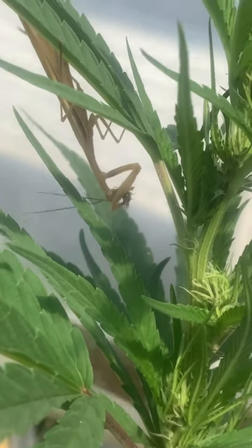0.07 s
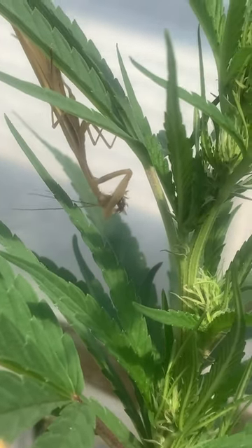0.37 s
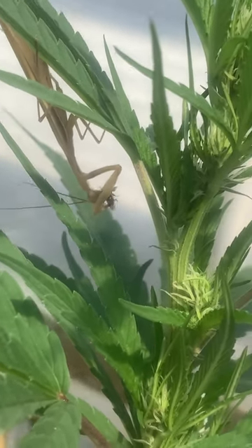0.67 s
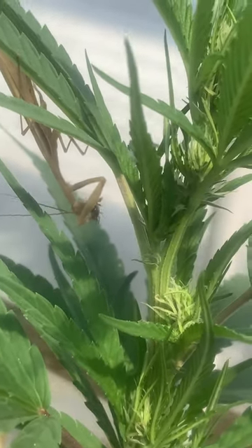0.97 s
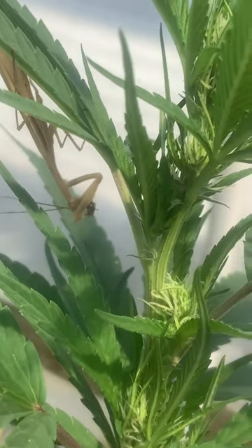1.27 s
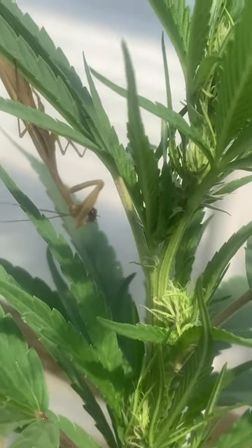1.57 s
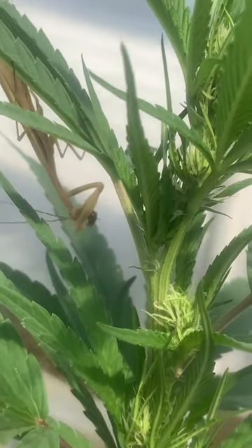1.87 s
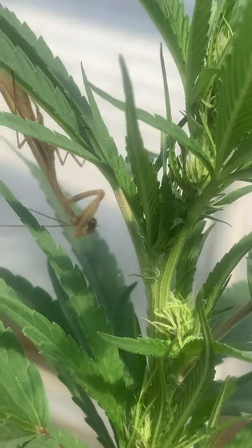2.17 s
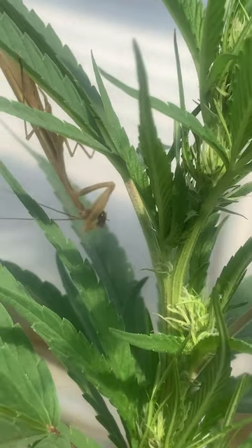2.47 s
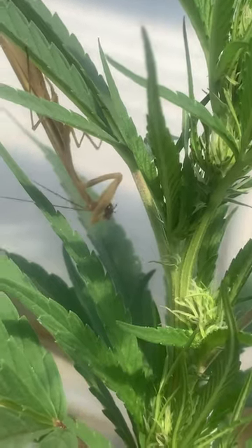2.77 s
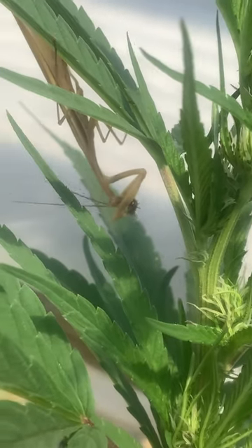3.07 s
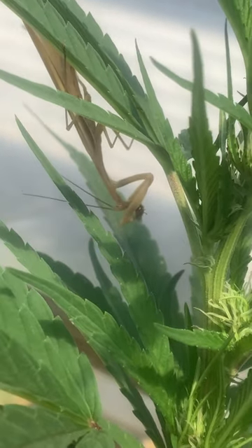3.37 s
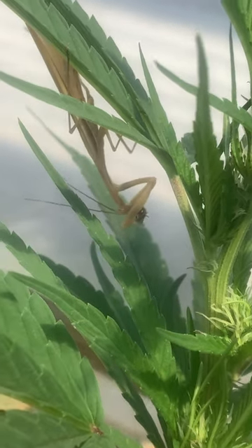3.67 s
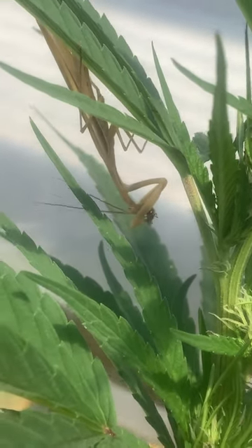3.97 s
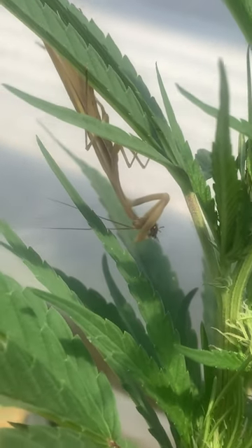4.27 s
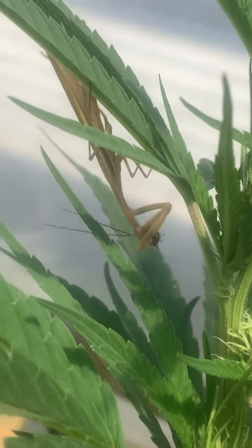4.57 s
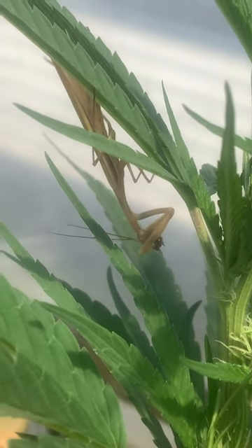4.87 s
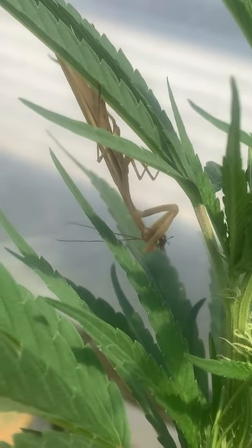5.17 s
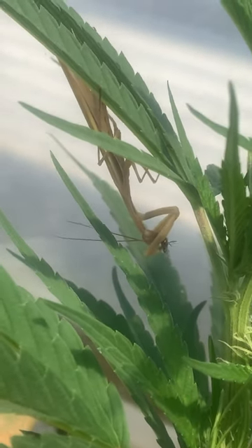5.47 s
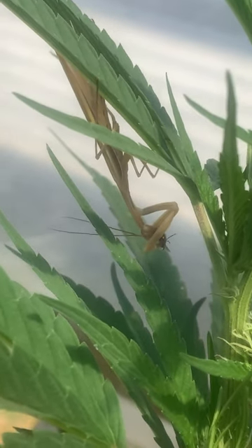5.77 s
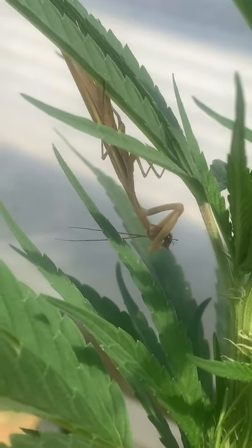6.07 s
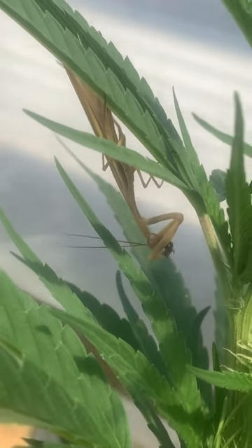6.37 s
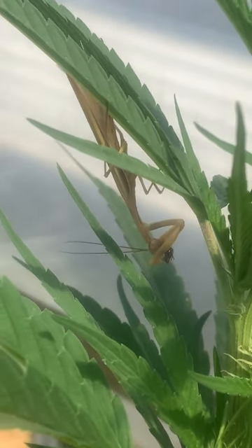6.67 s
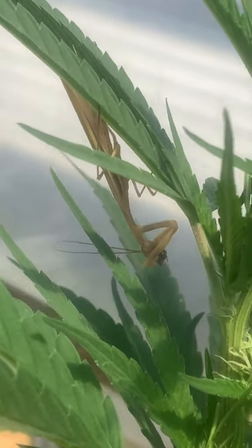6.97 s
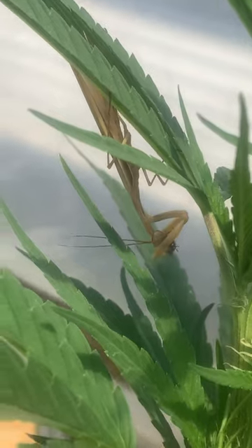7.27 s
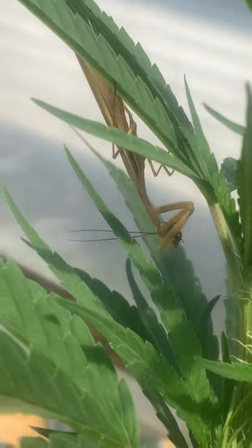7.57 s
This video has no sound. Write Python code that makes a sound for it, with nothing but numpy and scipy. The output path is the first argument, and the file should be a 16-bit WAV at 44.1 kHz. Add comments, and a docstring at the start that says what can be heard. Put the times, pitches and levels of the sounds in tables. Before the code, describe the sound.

A low machine drone, like an air conditioner some way off in a quiet garden, runs throughout, with motor hum, rushing air and a thin hiss. A narrow, fairly low tone swells out of it at about 0.7, 2.6, 3.4 and 4.1 seconds. Close by, a leaf brushes another in faint, bright, fizzy strokes, sparse at first, then about seven a second from 0.6 seconds, slowing slightly. Small dry stem ticks fall irregularly among them, sharpest near 1.2 and 1.5 seconds, bunched between 2 and 2.6, with others near 3.9, 4.2 and 5.2. Firmer brushes come around 1.4, 2.2 and 4.8 seconds. Stems give a tiny scrape at 2.7 and a short cluster of falling scrapes near 5.6. The plant then almost settles, with a faint brush at 6.2 and a tick and brush at 7.1, while the drone continues until about 7.6 seconds.

```python
"""A swaying leaf brushes its neighbour close by, over the hum of a machine in a quiet garden.
The leaf grazes about seven times a second and slows; each brush is a fizz of tiny slips, some firmer.
Stems tick as they catch and let go, and scrape as they slide. Some way off the machine, likely an
air conditioner, drones with motor tones and rushing air; a narrow tone near 380 Hz swells and sinks.
The two channels share the bass and drift apart in phase towards the treble, over a thin hiss."""
import sys
import numpy as np
from scipy import signal
from scipy.fft import rfft, irfft
from scipy.io import wavfile
from scipy.ndimage import uniform_filter1d

SR = 44100
rng = np.random.default_rng(int(sys.argv[2]) if len(sys.argv) > 2 else 0)


def master_out(mix):
    """Clip the mix to full scale and print it as 16-bit PCM to the path in sys.argv[1]."""
    frames = np.transpose(np.atleast_2d(mix))
    ceiling = np.clip(frames, -1, 1)
    pcm = np.round(ceiling * 32767).astype(np.int16)
    wavfile.write(sys.argv[1], SR, pcm)


N = 336042
T = np.arange(N) / SR
HZ = np.fft.rfftfreq(N, 1 / SR)


# Bright fizz of a sliding leaf: freq_hz, gain_db
FIZZ_EQ = [(600, -15), (2000, -8.5), (4000, -8.5), (5000, -5), (6200, -2.5), (7500, -6.5), (9500, -6.5),
           (12500, -1.5), (14500, -6), (15700, -10), (18000, -10)]
# Dull body of a leaf's rub or a stem's knock: freq_hz, gain_db
BODY_EQ = [(400, -20), (1500, -9), (2200, 15), (3000, 8), (3900, 1), (5500, -13), (9000, -25)]
# Leaf brushes: peak_s, level_db, length_s, rub_gain, tilt_db_per_octave, ring_hz, ring_db
BRUSHES = [ (0.075, -80, 0.046, 0.14, 4, 14000, 2.5), (0.562, -81, 0.033, 0, 3, 12000, 3),
           (.72, -82, .03, 0, 3, 12000, 2), (.885, -77, .022, 0.12, 1, 10000, 2),
           (0.993, -71, .037, 0.041, 1, 13700, 6), (1.15, -66.5, .028, 0, 0, 10200, 8),
           (1.281, -73.5, 0.034, 0.51, 0, 10000, 2), (1.416, -63, .019, 0.075, 0, 6700, 9),
           (1.562, -66, 0.011, .05, -1, 9700, 3), (1.701, -74, 0.034, 0.67, 0, 10000, 2),
           (1.811, -67.5, 0.029, 0.37, 2.5, 10500, 2), (1.96, -71, 0.029, 0.61, 0, 6400, 2),
           (2.096, -73, .034, .55, 0, 10000, 2), (2.229, -62.5, 0.026, 0.36, 1.5, 10100, 8),
           (2.348, -69.5, 0.036, 0.32, -3, 13000, 5), (2.456, -73, .031, 0.33, 1, 10000, 0),
           (2.598, -73, 0.027, 0.41, -1, 10000, 2), (2.722, -76, 0.039, 0.86, -2, 6500, -3),
           (2.871, -72.5, 0.037, .2, 1, 10000, 0), (2.969, -73.5, .028, .43, -3, 10000, 4),
           (3.104, -72.5, .025, .05, 1, 6300, 8), (3.266, -72, 0.04, 0.16, -1.5, 10000, 2),
           (3.38, -73.5, 0.043, 0.021, -1, 6500, 3), (3.519, -73.5, 0.05, 0.097, 0, 6500, 0),
           (3.637, -73, .028, 0.19, -1.5, 6480, 0), (3.795, -73, .032, 0.12, -2, 6510, 2),
           (3.94, -74.5, .03, .13, -1, 6500, 4), (4.09, -76.5, .027, .1, 4, 10000, 3),
           (4.264, -75, 0.05, 0.14, 0, 10000, 2), (4.43, -76, .03, .1, 2, 12000, 0),
           (4.621, -75, 0.031, 0.44, 1, 10000, 2), (4.792, -63.5, .027, 0.21, 3, 12600, 3),
           (4.938, -69.5, 0.027, 0.79, 0, 7740, 7), (5.036, -77, 0.045, 0.67, -2, 10000, 2),
           (5.146, -73, 0.094, 0.58, -1, 10400, 8), (5.368, -74.5, .085, 0.28, -1, 10000, 2),
           (5.48, -73.5, 0.063, 0.86, 4, 14200, 8), (5.572, -73, 0.024, .8, -1, 9600, 12),
           (5.614, -76, .024, 0.2, -2, 6000, 4), (6.227, -73, .024, .05, 1, 10180, 5),
           (7.121, -65.5, .027, 0.3, -2, 9070, 10)]

def leaf_brushes(ripple_db=3.5, grain_db=3.0, catch_db=1.5, size=16384):
    """A leaf slides over another: a bright, ringing fizz of slips over a duller rub."""
    out, t = np.zeros(N), centred_time(size)
    for peak_s, level_db, length_s, rub_gain, tilt, ring_hz, ring_db in BRUSHES:
        tilted_eq = [(hz, db + tilt * np.log2(hz)) for hz, db in FIZZ_EQ]
        fizz = coloured(slips(grain_db, catch_db, size), tilted_eq, ripple_db, ring_hz, ring_db)
        rub = coloured(slips(grain_db, catch_db, size), BODY_EQ, ripple_db)
        add_centred(out, peak_s, amp(level_db) * stroke(t, length_s) * (fizz + rub_gain * rub))
    return out


# Crisp snap of a stem: freq_hz, gain_db
SNAP_EQ = [(1000, -24), (4000, -26), (7000, -8), (8300, -15), (9800, 3), (11500, -8), (14000, -4),
           (15700, -7), (18000, -22)]
# Dry stem ticks: start_s, energy_db, decay_s, knock_gain
TICKS = [ (.169, -55, .0009, 1), (1.2107, -45, .0012, 0.5), (1.402, -51, .003, .1),
         (1.545, -40, .0022, -0.1), (1.902, -59, .002, 2), (2.063, -50.5, 0.0073, 2), (2.203, -51, .003, 1),
         (2.321, -52, .003, 1.5), (2.348, -52, .003, -1), (2.439, -52, .005, 1.5),
         (2.575, -55, 0.0022, 1.7), (3.348, -59, .002, 3.5), (3.886, -47.5, 0.0013, 0.3),
         (4.243, -53, 0.0029, 1), (5.226, -49, 0.001, 0.8), (5.464, -53, 0.0034, 1), (5.701, -59, .003, 0),
         (5.719, -57, 0.0013, 0), (7.104, -54, 0.0035, 1)]

def stem_ticks(chatter=0.2, ripple_db=3, size=2048):
    """A stem catches and lets go: a click and a short chatter, bright over a duller knock."""
    out, t = np.zeros(N), centred_time(size)
    for start_s, energy_db, decay_s, knock_gain in TICKS:
        tail = (t > 0) * np.exp(-abs(t) / decay_s) * rng.standard_normal(size)
        release = (t == 0) + chatter * tail
        snap = coloured(release, SNAP_EQ, ripple_db)
        knock = coloured(release, BODY_EQ, ripple_db)
        add_centred(out, start_s, amp(energy_db) * (snap + knock_gain * knock) / np.sqrt(size))
    return out


# Stem sliding on stem: peak_s, level_db, length_s, pitch_hz, fall_octaves_per_s
SCRAPES = [(2.679, -70.5, 0.012, 3470, 10), (5.505, -76, .045, 3440, 2), (5.556, -58, 0.0055, 1990, 130),
           (5.572, -62.5, .019, 1630, 8), (5.564, -71, 0.032, 4560, 9), (5.631, -69.5, .018, 4350, 12)]

def stem_scrapes(relative_width=0.3, grain_db=3, catch_db=0.5, size=16384):
    """Stems rub together: the slips ring one broad resonance that slides down."""
    out, t = np.zeros(N), centred_time(size)
    for peak_s, level_db, length_s, pitch_hz, fall in SCRAPES:
        glide_hz = pitch_hz * 2 ** np.clip(-fall * t, -1, 1)
        carrier = np.exp(2j * np.pi * np.cumsum(glide_hz) / SR)
        pole = np.exp(-np.pi * relative_width * pitch_hz / SR)
        friction = slips(grain_db, catch_db, size)
        # Shift down, low-pass, shift back: a resonance that follows the glide.
        ring = (carrier * signal.lfilter([1 - pole], [1, -pole], friction / carrier)).real
        add_centred(out, peak_s, amp(level_db) * stroke(t, length_s) * unit(ring))
    return out


# Fan shaft and blades, compressor and mains hum: pitch_hz, level_db, flutter_depth
MOTOR_TONES = [(27.5, -82.5, 0.13), (56.96, -56.5, 0.055), (115.1, -64, 0.25), (120.44, -56.5, 0.08),
               (164.1, -63.5, 0.091), (327.7, -74, 0.43)]

def motor_hum(flutter_hz=0.93, whine_hz=3378, whine_db=-95, whine_flutter=0.062):
    """Motor tones and a thin whine, which flutter in level and phase on their way."""
    out = np.zeros(N)
    for pitch_hz, level_db, depth in [*MOTOR_TONES, (whine_hz, whine_db, whine_flutter)]:
        wobble = flutter(depth, flutter_hz)
        out += tone(pitch_hz * T + rng.random(), level_db, wobble)
    return out


# Swells of a narrow tone at the top of the drone: time_s, level_db, pitch_hz
DRONE_SWELLS = [(0, -66, 376), (.4, -72, 384), (.68, -55.5, 380), (1.1, -72, 378), (2.4, -73, 381),
                (2.55, -54.5, 382), (2.7, -52, 383), (2.9, -75, 380), (3.2, -69, 378), (3.38, -53.5, 377),
                (3.6, -68, 378), (3.9, -62, 375.6), (4.05, -54.5, 378), (4.27, -55, 375),
                (4.7, -75.5, 377.6), (7.6, -73.5, 378)]

def swelling_tone(flutter_depth=0.27, flutter_hz=7):
    """A narrow tone near 380 Hz that swells out of the drone and sinks back."""
    time_s, level_db, pitch_hz = np.transpose(DRONE_SWELLS)
    cycles = np.cumsum(np.interp(T, time_s, pitch_hz)) / SR
    return tone(cycles, np.interp(T, time_s, level_db), flutter(flutter_depth, flutter_hz))


# Smooth slope of the rumble: freq_hz, density_db (power per Hz)
RUMBLE_SPECTRUM = [(22, -89), (31, -89.5), (40, -86.5), (55, -72), (120, -77), (200, -78.5), (380, -82),
                   (580, -90.5), (1150, -95.5), (1300, -100), (1800, -106), (2500, -115.5), (4000, -123),
                   (7000, -138)]
# Resonances of the casing and the yard: centre_hz, width_hz, lift_db
RESONANCES = [(83.4, 13.2, 7.5), (150, 12, 7), (255.7, 28, 5.5), (307.6, 22.6, 11.5), (337.8, 25.9, 11),
              (376.5, 31.8, 11), (458.4, 53.5, 6.5), (502.9, 45, 7.5), (658.5, 82, 8), (789, 34, 4.5),
              (938, 39, 6.5), (1407, 56, 7), (1481, 78, 5.5), (1633, 53, 4), (1970, 29, 6.5)]
# How alike the rumble is left and right: freq_hz, correlation (0-1)
RUMBLE_CORRELATION = [(60, 1), (200, 0.96), (370, 0.98), (430, 0.73), (510, 0.83), (580, 0.6), (670, 0.68),
                      (830, 0.38), (950, 0.1), (1250, 0.8), (1400, 0.61), (1700, 0.8), (2050, 0),
                      (2500, 0.42), (4000, 1)]

def air_rumble(swell_db=0.34, swell_hz=4):
    """The machine's rushing air, heard through fixed resonances and swelling a little."""
    lift_db = sum(db * bell(HZ, centre_hz, width_hz) for centre_hz, width_hz, db in RESONANCES)
    air = noise_pair(curve(RUMBLE_SPECTRUM, HZ) + lift_db, curve(RUMBLE_CORRELATION, HZ))
    return treble_flicker(drone_lean(air) * amp(swell_db * drift(swell_hz)))


# Lift of the drone's upper resonance and equal cut of its lower: time_s, lean_db
DRONE_LEAN = [(.15, -3.5), (.7, -2.1), (2.1, 0), (2.65, 0), (3.05, 0), (3.4, 1), (3.8, 0), (4.15, 0),
              (4.5, 0), (5.3, 0), (5.9, -3.3), (6.5, -0.1), (7.4, -2)]

def drone_lean(air, low_hz=311, high_hz=378, width_hz=110):
    """The weight of the drone shifts slowly between its two resonances."""
    lean_db = np.interp(T, *np.transpose(DRONE_LEAN))
    low, high = (irfft(rfft(air) * bell(HZ, hz, width_hz), N) for hz in (low_hz, high_hz))
    return air + (amp(-lean_db) - 1) * low + (amp(lean_db) - 1) * high


def treble_flicker(air, depth_db=3.0, rate_hz=18, width_hz=170, full_above_hz=1500, size=1024):
    """The upper rumble flickers in random patches of time and frequency; the bass stays steady."""
    hop = size // 4
    frame = dict(nperseg=size, noverlap=size - hop)
    hz, times, spectra = signal.stft(air, SR, **frame)
    patches = rng.standard_normal((len(hz), N // hop + 10))
    patches = uniform_filter1d(patches, round(width_hz * size / SR), axis=0)
    patches = unit(uniform_filter1d(patches, round(SR / hop / rate_hz), axis=1))
    band_depth_db = depth_db * np.clip(hz / full_above_hz, 0, 1)[:, None]
    flicker = amp(band_depth_db * patches[:, :len(times)])
    return signal.istft(spectra * flicker, SR, **frame)[1][:, :N]


def slips(grain_db, catch_db, size):
    """A dense run of tiny slips, which bunch up where the surfaces catch."""
    grain = grain_db * rng.standard_normal(size // 16).repeat(16)
    catch = catch_db * unit(uniform_filter1d(rng.standard_normal(size), 200))
    return rng.standard_normal(size) * amp(grain + catch)


def stroke(t, length_s, skew=0.099):
    """Speed of a slide: it swells over about length_s and fades a little more slowly."""
    return np.exp(-abs(t / (length_s * (1 + skew * np.sign(t)))) ** 1.66)


def coloured(x, eq, ripple_db, ring_hz=0, ring_db=0, ring_width_hz=870):
    """Gives a leaf or stem its own voice at rms 1: an EQ, small random peaks and an optional ring."""
    hz = np.fft.rfftfreq(len(x), 1 / SR)
    ripple = np.interp(hz, np.linspace(0, SR / 2, 56), rng.standard_normal(56))
    gain_db = curve(eq, hz) + ripple_db * ripple + ring_db * bell(hz, ring_hz, ring_width_hz)
    return unit(irfft(rfft(x) * amp(gain_db), len(x)))


def tone(cycles, level_db, wobble):
    """A sine at an rms level, then modulated by a complex wobble."""
    return np.sqrt(2) * amp(level_db) * (wobble * np.exp(2j * np.pi * cycles)).real


def flutter(depth, rate_hz):
    """A complex gain that wanders around 1 in level and phase."""
    return 1 + depth * (drift(rate_hz) + 1j * drift(rate_hz))


def drift(rate_hz):
    """A slow random wander of rms 1."""
    return unit(irfft(rfft(rng.standard_normal(N)) * np.exp(-(HZ / rate_hz) ** 2), N))


def noise_pair(density_db, correlation):
    """Two channels of noise with the given level per Hz and likeness."""
    left, other = rfft(rng.standard_normal((2, N))) * np.sqrt(SR / 2)
    right = correlation * left + np.sqrt(1 - correlation ** 2) * other
    return irfft(np.array([left, right]) * amp(density_db), N)


def amp(db):
    """Decibels to gain."""
    return 10 ** (np.asarray(db) / 20)


def unit(x):
    """Scales to rms 1."""
    return x / np.sqrt(np.mean(x ** 2) + 1e-20)


def curve(points, hz):
    """Joins (freq_hz, value) points by lines on a log-frequency axis."""
    freq_hz, value = np.transpose(points)
    return np.interp(np.log(hz + 1), np.log(freq_hz), value)


def bell(x, centre, width):
    """A bell of height 1 and the given full width at half height."""
    return .5 ** ((2 * (x - centre) / width) ** 2)


def centred_time(size):
    """Seconds from the middle of a short sound."""
    return (np.arange(size) - size // 2) / SR


def add_centred(mix, centre_s, sound):
    """Lays a sound into the mix with its middle at centre_s."""
    start = round(centre_s * SR) - len(sound) // 2
    sound = sound[max(-start, 0):]
    part = mix[max(start, 0):][:len(sound)]
    part += sound[:len(part)]


def scene():
    """The far drone with the near plant in front of it."""
    drone = air_rumble() + motor_hum() + swelling_tone()
    plant = leaf_brushes() + stem_scrapes() + stem_ticks()
    return drone + plant


# Thin microphone hiss: freq_hz, density_db (power per Hz)
HISS_SPECTRUM = [(2000, -120), (4000, -120.5), (5500, -121), (7000, -122.5), (8300, -121), (10000, -119.5),
                 (12000, -122.4), (14500, -126), (15100, -129.5), (15700, -142)]
# Phase of left ahead of right: freq_hz, lead_rad
LEFT_LEAD = [(60, 0), (350, -.15), (700, -.5), (960, -1), (1040, 1.4), (1450, .6), (1800, 1.5), (2550, 2.5),
             (3400, 1.5), (4100, 2.1), (4750, 3.14), (8900, 9.42), (13150, 15.7), (16000, 19.5)]
# Level of left over right: freq_hz, balance_db
LEFT_BALANCE = [(60, -.5), (380, -.5), (700, -2.3), (1200, -1.2), (2000, .8), (3000, 0), (15000, 0)]

def record(dry, cutoff_hz=15800):
    """Adds hiss, turns the channels apart in phase and level, and cuts the top end."""
    hiss = noise_pair(curve(HISS_SPECTRUM, HZ), correlation=1.0)
    side = np.array([[.5], [-.5]])
    phase_turn = np.exp(1j * side * np.interp(HZ, *np.transpose(LEFT_LEAD)))
    balance = amp(side * curve(LEFT_BALANCE, HZ))
    stereo = irfft(rfft(dry + hiss) * phase_turn * balance, N)
    lowpass = signal.firwin(511, cutoff_hz, window=("kaiser", 9), fs=SR)
    return signal.oaconvolve(stereo, lowpass[None], "same")


dry = scene()
out = record(dry)
master_out(out)
```